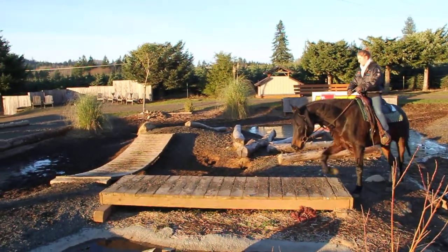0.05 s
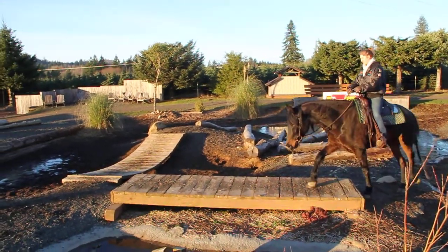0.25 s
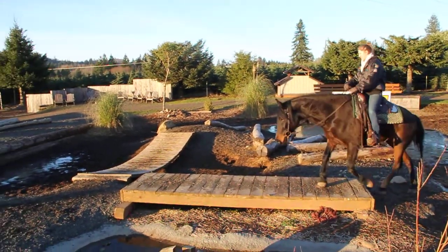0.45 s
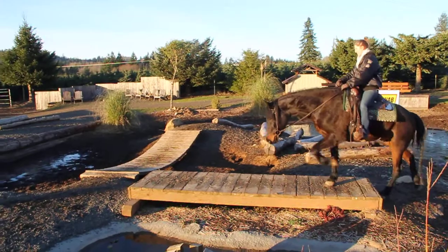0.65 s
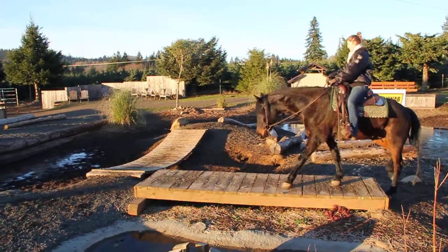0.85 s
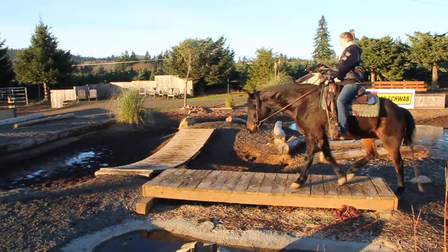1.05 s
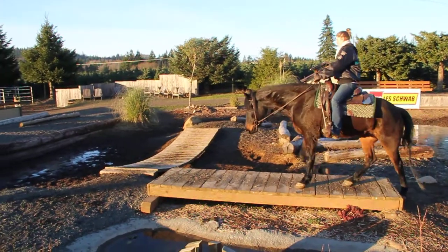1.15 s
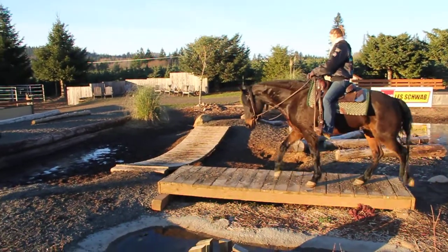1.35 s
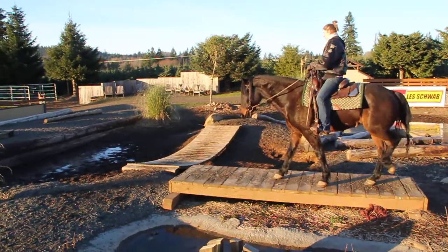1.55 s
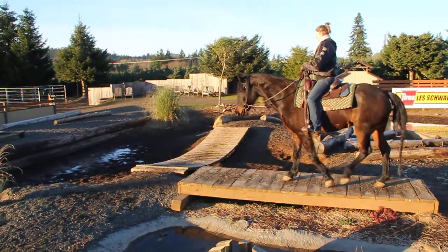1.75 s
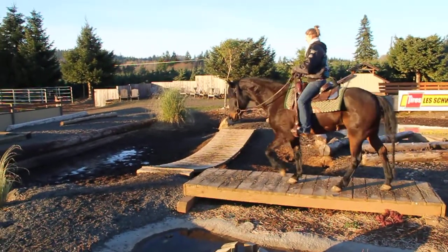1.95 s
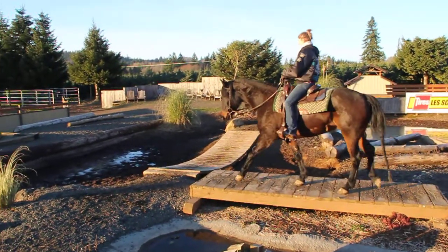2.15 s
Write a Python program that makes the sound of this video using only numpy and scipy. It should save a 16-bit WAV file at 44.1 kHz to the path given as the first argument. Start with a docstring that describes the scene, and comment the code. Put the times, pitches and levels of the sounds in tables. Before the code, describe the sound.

A horse's hooves knock on a low wooden platform outdoors. A hollow thud lands at about 0.2 seconds and a lighter step near 0.45. Sharper knocks follow at 0.9 and 1.1 seconds, a duller cluster around 1.5, and a strong ringing knock near 1.9. Grit crunches slightly under the hooves and gravel rustles faintly between steps, over a steady far-off rush and light low wind.

```python
"""Outdoors, on a low plank platform, a horse steps up and walks along the boards.
Each hoof strikes heel then toe, exciting the modes of the deck and the boom of its frame,
and crushes a little grit. Gravel is kicked and rustles faintly on the ground.
Banks and logs scatter weak echoes; behind it all are a far-off rush and light low wind."""
import sys
import numpy as np
from scipy import signal
from scipy.fft import rfft, irfft
from scipy.io import wavfile

SR = 44100
rng = np.random.default_rng(int(sys.argv[2]) if len(sys.argv) > 2 else 0)


def wav_out(sig):
    """Save sig, one row per channel (or a flat mono array), as 16-bit PCM at SR to the path in sys.argv[1]."""
    wavfile.write(sys.argv[1], SR, np.round(np.clip(np.atleast_2d(sig).T, -1, 1) * 32767).astype(np.int16))


N = 97020


def hoof(force_db, contact_ms, place, boom_db, note_hz, note_db, note_t60):
    """Impact excitation: longer contact gives a duller knock, and the place struck weights the modes."""
    # Modes of the deck. Each row: frequency in Hz, level in dB, time to decay by 60 dB in seconds.
    deck_modes = [(77, -24, 0.11), (107, -22.5, 0.088), (139.2, -15.5, .19), (165.4, -19.5, 0.23),
                  (223.9, -9.5, 0.07), (271.6, -14.5, 0.072), (326, -16, 0.062), (433, -17.5, 0.067),
                  (565, -16.5, .06), (664, -21.5, 0.03), (731, -12.5, 0.066), (920, -11.5, 0.033),
                  (1006, -17.5, 0.03), (1167, -12, 0.027), (1477, -15.5, 0.034), (2120, -18, 0.022)]
    frame_hz, radiation_hz = 195, 59.4
    rise_cycles = 0.35
    t = np.arange(SR // 2) / SR
    contact_phase = t * 1000 / contact_ms
    push = (np.sin(np.pi * contact_phase) ** 2)[contact_phase < 1]
    ring = 0
    for k, (hz, db, t60) in enumerate(deck_modes):
        frame_db = boom_db / (1 + (hz / frame_hz) ** 6)  # the boom lies in the low modes
        coupling = np.cos(np.pi * place * k)
        ring = ring + coupling * amp(db + frame_db) * mode(t, hz, t60, rise_s=rise_cycles / hz)
    knock = amp(force_db) * signal.fftconvolve(ring, push / push.sum())[:len(t)]
    board_note = amp(note_db) * mode(t, note_hz, note_t60, rise_s=0.00085)
    # The open deck hardly radiates the deepest bass.
    bass_loss = signal.butter(3, radiation_hz, "high", fs=SR, output="sos")
    return signal.sosfilt(bass_loss, knock + board_note)


def hoofbeats():
    """Superposition: the ringing of successive heel and toe contacts adds up on the deck."""
    # Each row: start in seconds, force in dB, contact time in ms, place across the deck from 0 to 1,
    # frame boom in dB, then the board note's frequency in Hz, level in dB and 60 dB decay in seconds.
    contacts = [(0.2130, -16.5, 0.96, 0.29, 11, 673, -13, 0.023),
                (0.2176, 2.5, 3.6, 0.55, 1, 156.3, -6.5, 0.063),
                (0.258, -9, 4.5, 0.36, 8, 154, -20.5, 0.15),
                (0.3140, -16.5, 3.9, 0.9, 6.5, 125, -21, 0.024),
                (0.4448, -13.5, 1.3, 0.34, -7, 375, -22, 0.08),
                (0.4508, -5.5, 2.1, 0.09, -1, 636, -26.5, 0.11),
                (0.5291, -16, 1.7, 0.07, 3.5, 200, -24, 0.032),
                (0.621, -31, 3.3, 0.1, -3, 132, -29.5, 0.059),
                (0.6671, -32, 1.2, 0.82, -8, 90, -18.5, 0.039),
                (0.8838, 2.5, 0.71, .244, -16.5, 543, -11, 0.085),
                (0.8920, -1.5, 0.73, 0.68, -8, 600, -3, 0.016), (1.0613, -1.5, 4.2, .6, -3, 730, -25, .063),
                (1.1100, 2.5, 0.34, .56, 0, 801, 7.5, 0.0077), (1.1204, -8, 0.56, .11, 1, 430, -9.5, 0.041),
                (1.4515, -19.5, 0.87, 0.04, 5, 206, -29, 0.072), (1.4600, 2.5, 6, 0.34, -10, 80, -24, .07),
                (1.4961, -9.5, 1.52, 0.77, -19, 192, -29, 0.055),
                (1.5040, -6.5, 1.68, 0.51, -8, 252, -33, 0.064),
                (1.5244, -18, 2.4, 1, -4, 175, -14.5, 0.02), (1.5390, -13, 5.6, 0.1, -11, 120, -18, 0.038),
                (1.7520, -34, 4, .3, -4, 103, -32, .04), (1.8761, 7.5, 1.8, .82, -4, 290.5, -13.5, 0.12),
                (1.8819, -3.5, 1.37, 0.11, -3, 228, -11.5, 0.031)]
    beats = np.zeros(N)
    for start, *contact in contacts:
        add(beats, start, hoof(*contact))
    return beats


def crunches(bursts, spectrum):
    """Brittle fracture: grains crack while a hoof bears on them, then the sound decays exponentially."""
    fade_s = 0.0044
    t = np.arange(4096) / SR
    track = np.zeros(N)
    for start, hold_s, db in bursts:
        cracks = colour(grains(len(t), per_s=16000, spread_db=3.0), spectrum)
        envelope = np.exp(-np.maximum(t - hold_s, 0) / fade_s)
        add(track, start, amp(db) * cracks * envelope)
    return track


def crushed_grit():
    """Crushing under load: grit between hoof and board gives short bursts of clicks."""
    # Each row: start in seconds, time under load in seconds, level in dB.
    bursts = [(0.2113, 0.006, -25.5), (0.2214, 0.0052, -28.5), (0.4520, 0.0083, -38),
              (0.8847, 0.0051, -38.5), (1.0607, 0.0046, -36), (1.07, 0.0075, -38.5), (1.109, 0.0075, -31),
              (1.114, 0.018, -34.5), (1.485, 0.0011, -40.5), (1.5368, 0.0021, -36), (1.8757, 0.0058, -33)]
    # Each row: frequency in Hz, relative level in dB.
    spectrum = [(300, 14.5), (800, 11.5), (1700, 8.5), (2600, -2), (4200, 0), (7000, -9.5), (11000, -10),
                (16000, -11)]
    return crunches(bursts, spectrum)


def kicked_gravel():
    """Granular collision: stones kicked on the ground give brief, faint clicks."""
    # Each row: start in seconds, time before the decay in seconds, level in dB.
    bursts = [(0.306, 0.0024, -56), (0.337, 0.0032, -46.5), (0.3625, 0.0038, -46), (0.521, 0.0076, -34),
              (0.564, 0.00074, -41.5), (0.5775, 0.0008, -45), (0.72, 0.0047, -50), (0.956, 0.0015, -47),
              (1.502, 0.0009, -42), (1.5550, 0.0018, -45.5), (1.578, 0.0027, -53), (1.632, 0.0054, -45.5),
              (1.65, 0.0026, -45), (1.804, 0.0039, -48), (1.944, 0.0016, -52)]
    # Each row: frequency in Hz, relative level in dB.
    spectrum = [(700, 2), (2000, 4), (2800, 3.5), (4400, 2.5), (7000, -14.5), (12000, -16), (16000, -18)]
    return crunches(bursts, spectrum)


def gravel_rustle():
    """Shot noise: the many tiny clicks of shifting gravel merge into a rustle, with an airy hiss on top."""
    # Each row: time in seconds, gravel level in dB, hiss level in dB.
    levels = [(0, -47, -55), (.08, -60.5, -74), (.2, -57, -64), (.38, -57, -72), (.58, -53.5, -78),
              (.7, -56.5, -59), (.82, -65, -76), (.97, -60, -62), (1.12, -59.5, -69), (1.24, -56, -57),
              (1.37, -64.5, -66), (1.6, -55.5, -67), (1.71, -62, -67), (1.79, -54, -66), (1.87, -60.5, -70),
              (2.2, -65, -68)]
    # Spectra of gravel and hiss. Each row: frequency in Hz, relative level in dB.
    gravel_spectrum = [(800, -8), (2200, 9.5), (4400, 5), (7500, -4.5), (13000, -12), (16000, -18)]
    hiss_spectrum = [(4000, 6), (7500, -12), (13000, 11), (16000, 4)]
    times, gravel_db, hiss_db = np.transpose(levels)
    t = np.arange(N) / SR
    gravel = colour(grains(N, per_s=3000, spread_db=4.0), gravel_spectrum)
    hiss = colour(rng.standard_normal(N), hiss_spectrum)
    return amp(np.interp(t, times, gravel_db)) * gravel + amp(np.interp(t, times, hiss_db)) * hiss


def echoes(sound):
    """Diffuse scattering: banks and logs return a weak tail that decays exponentially."""
    # Each row: frequency in Hz, relative level in dB.
    spectrum = [(60, -12), (150, -3.5), (350, 12), (1200, -5), (4000, -10.5), (16000, -7.5)]
    echo_db, t60 = -32, 0.52
    t = np.arange(SR // 2) / SR
    tail = colour(rng.standard_normal(len(t)), spectrum) * np.exp(-np.log(1000) * t / t60)
    return amp(echo_db) * signal.fftconvolve(sound, tail / np.linalg.norm(tail))[:N]


def distant_rush():
    """Broadband noise: a nearly steady far-off rush whose level wavers slightly."""
    # Each row: frequency in Hz, relative spectral density in dB.
    spectrum = [(100, -6), (230, -9), (360, -0.5), (480, -5), (850, 2), (1380, -1.5), (2000, -14),
                (2850, -29), (5000, -31.5), (8000, -35), (12000, -36), (16000, -58.5)]
    # Each row: time in seconds, level in dB.
    levels = [(0, -38), (.35, -38.7), (.85, -36.5), (1.4, -40), (2.2, -39.5)]
    level_db = np.interp(np.arange(N) / SR, *np.transpose(levels))
    swell_db = drift(rate_hz=7.6)
    return amp(level_db + swell_db) * colour(rng.standard_normal(N), spectrum)


def low_wind():
    """Amplitude modulation: small gusts swell and ease the low noise of the wind."""
    # Each row: frequency in Hz, relative spectral density in dB.
    spectrum = [(15, -36), (35, -31), (55, -1), (100, 1.5), (150, -4), (250, -13), (600, -20), (2000, -60)]
    mean_db, gust_db = -49.5, 2.0
    return amp(mean_db + gust_db * drift(rate_hz=4.3)) * colour(rng.standard_normal(N), spectrum)


def mode(t, hz, t60, rise_s):
    """Damped resonance: a sine swells quickly, then falls by 60 dB in t60 seconds."""
    envelope = (1 - np.exp(-t / rise_s)) * np.exp(-np.log(1000) * t / t60)
    return envelope * np.sin(2 * np.pi * hz * t)


def grains(size, per_s, spread_db):
    """Poisson process: clicks arrive independently, most small and a few large."""
    strengths = amp(spread_db * np.minimum(rng.exponential(1, size), 4))
    return strengths * rng.choice([-1, 1], size) * (rng.random(size) < per_s / SR)


def colour(x, points):
    """Spectral shaping: filters by a curve of (Hz, dB) points and scales to an rms of one."""
    hz = np.fft.rfftfreq(len(x), 1 / SR) + 1
    point_hz, point_db = np.transpose(points)
    gain = amp(np.interp(np.log(hz), np.log(point_hz), point_db))
    return unit(irfft(rfft(x) * gain, len(x)))


def drift(rate_hz):
    """Low-pass noise: a slow random wander with an rms of one."""
    hz = np.fft.rfftfreq(N, 1 / SR)
    gain = (hz > 0) * np.exp(-(hz / rate_hz) ** 2)
    return unit(irfft(rfft(rng.standard_normal(N)) * gain, N))


def amp(db):
    """Converts decibels to an amplitude ratio."""
    return 10 ** (np.asarray(db) / 20)


def unit(x):
    """Normalises to an rms of one."""
    return x / np.sqrt(np.mean(x ** 2) + 1e-20)


def add(mix, start_s, sound):
    """Superposes a sound on the mix from start_s onward."""
    part = mix[max(round(start_s * SR), 0):][:len(sound)]
    part += sound[:len(part)]


def scene():
    """Superposition: the steps, their echoes and the background sum in one channel."""
    steps = hoofbeats() + crushed_grit() + kicked_gravel()
    return (steps + echoes(steps) + gravel_rustle() + distant_rush() + low_wind())[None]


def record(dry):
    """Band limiting: a linear-phase low-pass filter removes the highest treble."""
    cutoff_hz = 16000
    low_pass = signal.firwin(511, cutoff_hz, window=("kaiser", 9), fs=SR)
    return signal.oaconvolve(dry, low_pass[None], "same")


dry = scene()
out = record(dry)
wav_out(out)
```